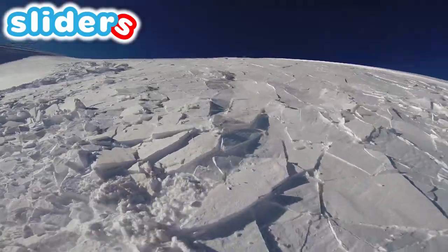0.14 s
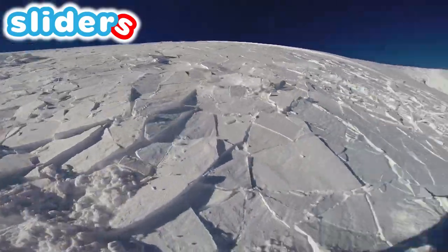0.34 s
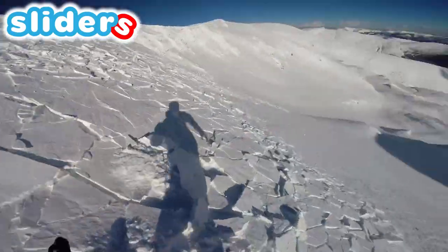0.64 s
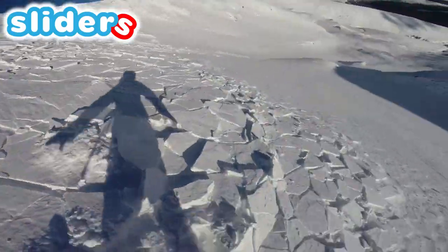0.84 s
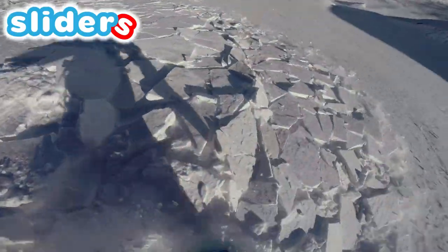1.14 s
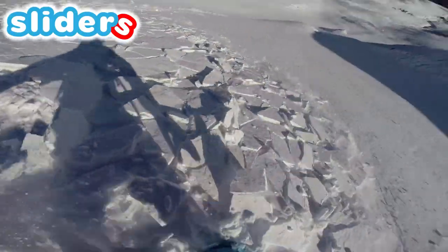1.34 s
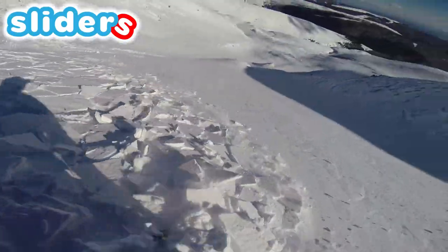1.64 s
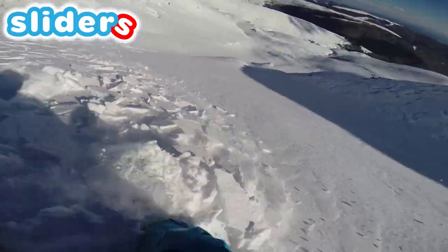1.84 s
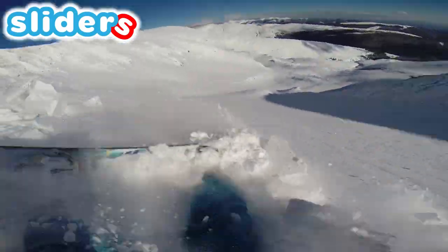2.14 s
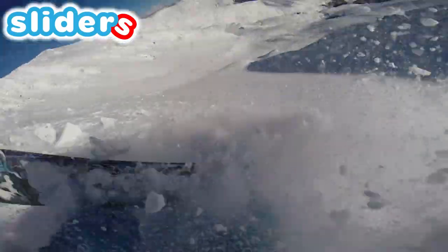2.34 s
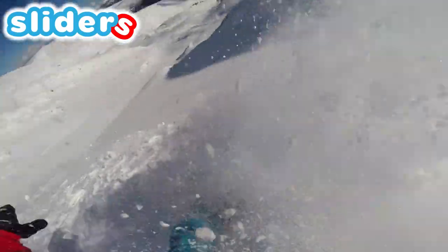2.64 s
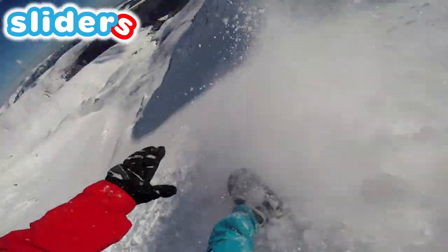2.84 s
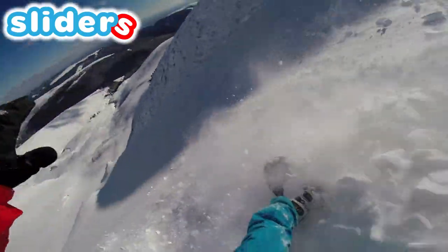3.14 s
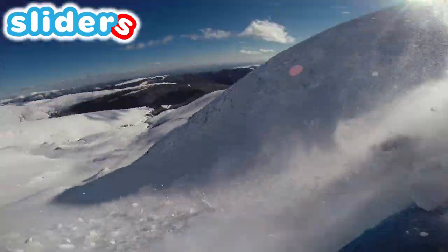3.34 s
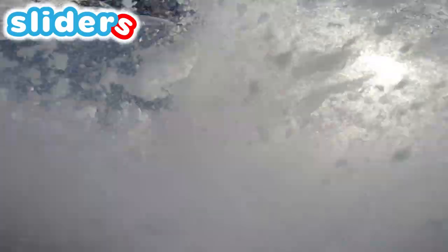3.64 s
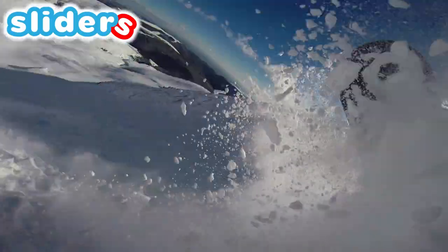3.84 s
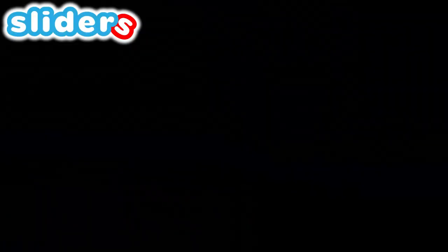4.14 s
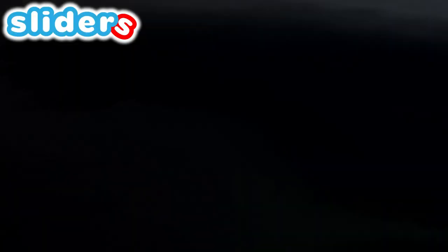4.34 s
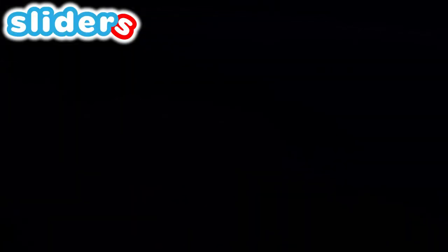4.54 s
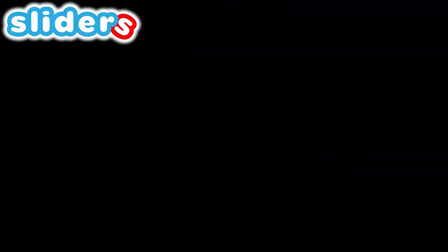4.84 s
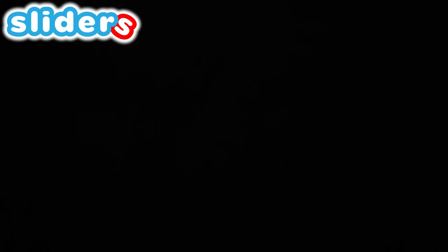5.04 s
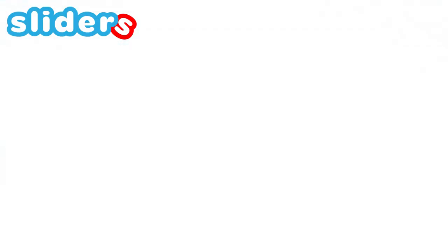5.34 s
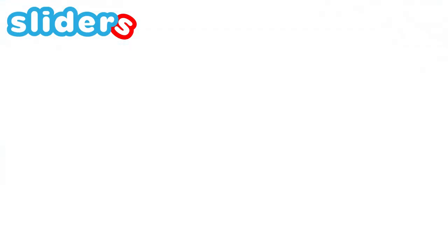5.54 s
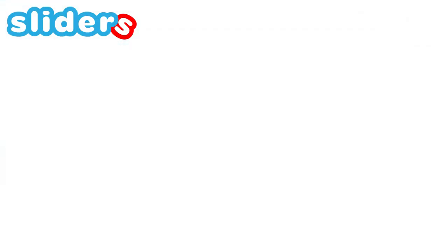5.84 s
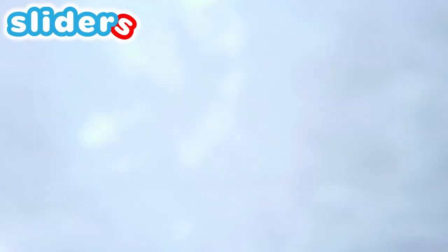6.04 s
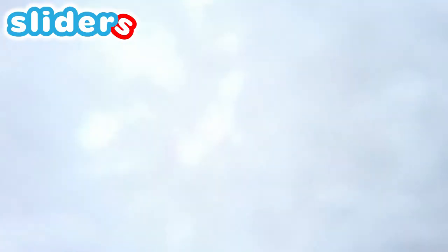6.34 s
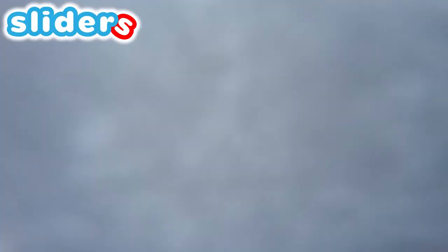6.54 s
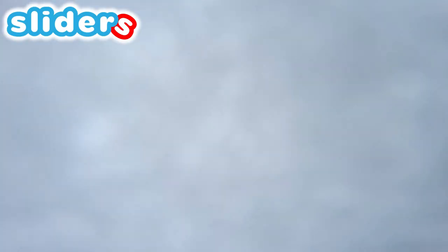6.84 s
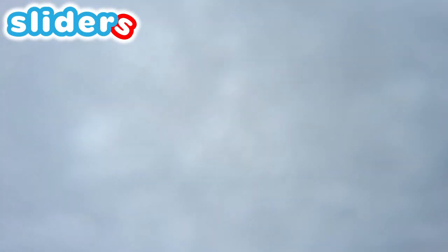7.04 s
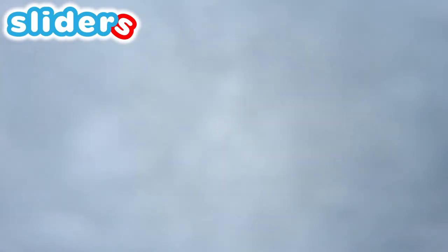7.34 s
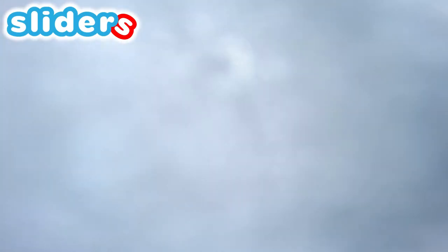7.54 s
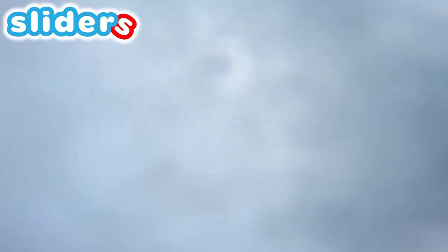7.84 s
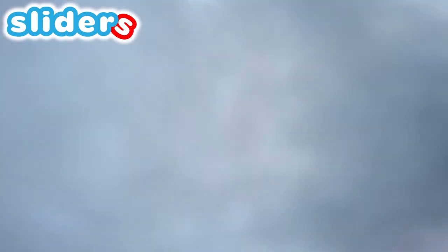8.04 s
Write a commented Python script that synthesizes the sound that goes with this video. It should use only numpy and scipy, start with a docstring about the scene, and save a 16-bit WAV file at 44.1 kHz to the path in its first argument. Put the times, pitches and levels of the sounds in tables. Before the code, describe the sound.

Sliding snow heard through a camera case, with no echo. Quiet rumbling and a few deep bouncing thuds lead to a crunchy double blow, then a brief calm. Knocks and icy spray thicken into a dense, loud, mid-heavy grinding roar with cracks and hollow clacks. The snow packs in jerks and subsides, with a hard hit, soft ticks and fine powder hiss before more heavy thuds.

```python
"""Rumble and dull thumps come first, with blocks crunching: a snowboarder is carried off by a slab avalanche.
The camera worn on the body is the microphone, so everything is close and there is no echo.
Later, snow buries the case, grinds and hisses across it, packs in jerks, eases, and strikes again.
Snow is random ice grains, filtered by the free or the buried case; blows on the mount ring as decaying sines.
Fine powder hisses on the microphone port, over a faint steady hiss and electronic whine."""
import sys
import numpy as np
from scipy import signal
from scipy.fft import rfft, irfft
from scipy.io import wavfile
from scipy.ndimage import uniform_filter1d

SR = 44100
rng = np.random.default_rng(int(sys.argv[2]) if len(sys.argv) > 2 else 0)


def digitize_waveform(pressure):
    """Quantize a signal to 16-bit integers and store it at the path in sys.argv[1].

    Rows of a 2-D input are taken as channels; values are limited to [-1, 1].
    """
    field = np.atleast_2d(pressure).T
    bounded = np.clip(field, -1, 1)
    quanta = np.round(bounded * 32767).astype(np.int16)
    wavfile.write(sys.argv[1], SR, quanta)


N = 361619
TIME = np.arange(N) / SR   # s

# Colour of dry powder and ice crystals at the microphone port: (frequency [Hz], relative level [dB])
POWDER_COLOUR = [(4000, 4.5), (7000, -1.5), (10000, 1), (13000, -7), (15500, -5.5)]
# Hardness is 0 for packed snow, below 0 for soft and dull, above 0 for icy and bright.
# Bass and treble lie this far under the middle at hardness 0:
SLIDE_FOCUS_DB, KNOCK_FOCUS_DB, CRUNCH_FOCUS_DB = 8, 12.5, 6.5


def from_db(db):
    """Decibels to gain."""
    return 10 ** (np.asarray(db) / 20)


def rms_one(x):
    """Scale to unit power."""
    return x / np.sqrt(np.mean(x ** 2) + 1e-20)


def even(x, span_s):
    """Hold the power near one over this span, keeping the finer grain."""
    power = np.abs(uniform_filter1d(x ** 2, int(span_s * SR) + 1))
    return x / np.sqrt(power + 1e-12)


def in_time(rows):
    """One curve per column, joined by straight lines."""
    s, *columns = np.transpose(rows)
    return [np.interp(TIME, s, column) for column in columns]


def drift(rate):
    """Slow random wandering with rms 1, through two random points per cycle of the rate in Hz."""
    knots = rng.standard_normal(N // 8)
    return rms_one(np.interp(TIME * rate * 2, np.arange(len(knots)), knots))


def gust(start, length, rise_s, fall_s):
    """Rise, hold and die away."""
    t = TIME - start
    return np.clip(t / rise_s, 0, 1) * np.exp(-np.clip((t - length) / fall_s, 0, 20))


def swell(s, length, rise, fall):
    """Pressure builds quickly, sags while the block gives way, and lets go."""
    out, start = np.zeros(N), int(s * SR)
    t = TIME[:min(N - start, SR // 4)]
    release = np.maximum(t - length * 0.72, 0) / fall
    out[start:start + len(t)] = np.minimum(t / rise, 1) * np.exp(-.5 * t / length - release)
    return out


def ring(s, hz, t60):
    """A mode struck at time s: a sine that falls 60 dB in t60 seconds."""
    out, start = np.zeros(N), int(s * SR)
    t = TIME[:min(N - start, SR)]
    out[start:start + len(t)] = np.sin(2 * np.pi * hz * t) * np.exp(-np.log(1000) * t / t60)
    return out


def press(strikes, contact_s):
    """Each strike becomes a push that peaks after the contact time and then relaxes."""
    keep = np.exp(-1 / (contact_s * SR))
    return signal.lfilter([np.e * (1 - keep)], [1, -2 * keep, keep ** 2], strikes + 1e-18)


def grains(per_s, spread_db):
    """Ice grains snapping at random: many small, a few large."""
    sizes = from_db(spread_db * np.minimum(rng.exponential(1, N), 5))
    signs = rng.choice([-1, 1], N)
    snaps = rng.random(N) < per_s / SR
    return rms_one(sizes * signs * snaps)


def colour(x, spectrum, low_hz=5, high_hz=20000, size=8192):
    """Causal minimum-phase filter with this spectrum between two edges; white noise keeps its power."""
    hz = np.maximum(np.arange(size // 2 + 1) * SR / size, 1)
    points = np.array(spectrum)
    gain = from_db(np.interp(np.log(hz), np.log(points[:, 0]), points[:, 1]))
    gain = rms_one(gain / np.sqrt((1 + (low_hz / hz) ** 10) * (1 + (hz / high_hz) ** 10)))
    # folding the cepstrum gives the minimum phase
    cepstrum = irfft(np.log(gain + 1e-6))
    cepstrum[1:size // 2] *= 2
    cepstrum[size // 2 + 1:] = 0
    return signal.oaconvolve(x, irfft(np.exp(rfft(cepstrum))))[:N]


def three_bands(drives, spectrum, churn_hz=150, grind_hz=1200, hiss_hz=3500):
    """Dull, middle and bright parts of one spectrum, each with its own drive."""
    edges = [churn_hz, grind_hz, hiss_hz, SR / 2]
    return sum(colour(x, spectrum, low, high) for x, low, high in zip(drives, edges, edges[1:]))


def resonance(x, hz, width_hz):
    """One resonance with gain 1 on top."""
    return signal.lfilter(*signal.iirpeak(hz, hz / width_hz, fs=SR), x + 1e-18)


def touch(level_db, hardness, focus_db):
    """Gains of the dull, middle and bright parts: the harder the snow, the higher its emphasis."""
    loss_db = focus_db * (np.array([[-1], [0], [1]]) - hardness) ** 2
    return from_db(level_db - loss_db + loss_db.min(axis=0))


def cover():
    """Share of the case that lies under snow, heaping up steadily and sliding off fast."""
    # Snow lying on the case: (from [s], until [s], share covered [0-1])
    burials = [(2.007, 2.417, 0.42), (2.5, 2.953, .6), (3.623, 3.773, 0.94), (3.905, 4.21, 0),
               (4.175, 4.38, 0.88), (4.443, 6.27, 0.99), (6.544, 7.1, 1), (7.146, 7.665, 1)]
    settle_s, shed_s = 0.055, 0.0046
    heaps = sum(share * gust(start, end - start, settle_s, shed_s) for start, end, share in burials)
    return np.clip(heaps, 0, 1)


def on_case(drives):
    """Three drives sound through the case, whose colour changes as snow covers it."""
    # Colour of snow on the free case: (frequency [Hz], relative level [dB])
    free_colour = [(140, 5), (280, -2), (500, -15), (750, -8), (950, -24), (1550, -10), (2100, -3.5),
                   (2700, -11.5), (3500, -27), (4300, -18), (5000, -28.5), (6200, -27), (9000, -39),
                   (15500, -49.5)]
    # Colour of snow on the buried case: (frequency [Hz], relative level [dB])
    buried_colour = [(140, -3.5), (400, -13), (800, -10.5), (1100, -13.5), (1400, -3.5), (1850, -2.5),
                     (2450, 5), (3050, -3.5), (4000, -10.5), (4750, -10.5), (6200, -5.5), (8500, -15),
                     (12200, -20), (15500, -33)]
    buried = cover()
    free_part = three_bands(drives * np.sqrt(1 - buried), free_colour)
    return free_part + three_bands(drives * np.sqrt(buried), buried_colour)


def background():
    """Steady hiss of filtered noise, with a thin whine of sines from the camera's electronics."""
    # Colour of the hiss: (frequency [Hz], relative level [dB])
    hiss_colour = [(150, 2), (300, 0.5), (550, -4.5), (1100, -3), (1500, 0), (2100, -6.5), (3600, -1.5),
                   (4400, -22.5), (5050, -8.5), (6000, -2.5), (7300, -19), (15500, -22)]
    # Faint steady whine: (frequency [Hz], rms level [dB])
    whine_tones = [(11719, -77), (14626, -80)]
    hiss = from_db(-56.5) * colour(rng.standard_normal(N), hiss_colour, 125)
    whine = sum(from_db(level_db) * np.sqrt(2) * np.sin(2 * np.pi * hz * TIME)
                for hz, level_db in whine_tones)
    return hiss + whine


def powder():
    """Puffs of tiny dry grains sift across the microphone port, almost all treble."""
    # Puffs of fine powder: (start [s], length [s], level [dB])
    puff_rows = [(2.505, .33, -53), (2.85, 0.6, -63), (3.48, 0.32, -50), (5.74, 0.45, -38.5),
                 (6.905, 0.098, -42.5), (7.18, 0.503, -45.5), (7.76, 0.34, -45), (7.308, .24, -34.5)]
    rise_s, fall_s = 0.053, 0.05
    puffs = sum(from_db(level_db) * gust(s, length, rise_s, fall_s) for s, length, level_db in puff_rows)
    return puffs * colour(grains(3400, 6.5), POWDER_COLOUR, 3700)


def rumble(shove, lump_db=-1.5, shove_rumble_db=5):
    """Lumpy low pressure on the case, from air buffeting the tumbling rider and from every shove."""
    # Buffeting of the air: (time [s], level [dB])
    buffeting = [(0, -39), (.35, -47), (.55, -34.5), (.98, -28.5), (1.5, -36), (2.1, -36), (2.38, -22.5),
                 (2.62, -38), (3.3, -31.5), (3.6, -24.5), (4.18, -23.5), (5.07, -35.5), (5.5, -21),
                 (6.2, -33.5), (6.4, -35.5), (7.15, -48), (7.6, -25.5), (8.2, -38)]
    # Colour of the rumble: (frequency [Hz], relative level [dB])
    low_colour = [(10, -21), (22, 9.5), (40, -1.5), (64, 6), (85, -4), (135, -8), (200, -22), (400, -61)]
    level_db, = in_time(buffeting)
    # shove rumble is set relative to the dull part of the shove
    pressure = np.hypot(from_db(level_db), from_db(shove_rumble_db) * shove[0])
    lumps = from_db(lump_db * drift(5.4))
    return pressure * lumps * even(colour(grains(1200, 3.2), low_colour), .15)


def shoves():
    """Dull, middle and bright pressure of passing snow masses; soft ones swell and fade more slowly."""
    # Masses shoving across the case: (start [s], length [s], level [dB], hardness [-])
    masses = [(0.533, 0.052, -42, -0.44), (0.724, 0.12, -38, -0.76), (1.072, 0.055, -51.5, -0.53),
              (1.464, 0.051, -45, -0.46), (1.974, 0.82, -56.5, -0.19), (2.227, 0.15, -44.5, -0.12),
              (2.533, 0.044, -57, -0.35), (2.655, 0.2, -47.5, 0.13), (3.356, .05, -36.5, -1.04),
              (3.483, 0.046, -40, 0.42), (3.628, 0.15, -38, 0.48), (3.957, 0.047, -25.5, -0.23),
              (4.036, .17, -31, -0.17), (4.26, 0.081, -25, -0.66), (4.452, 0.13, -23.5, 0),
              (4.547, 0.1, -19, -0.078), (4.625, 0.046, -23, -0.91), (4.732, .16, -21, -0.031),
              (4.93, 0.019, -26, 0.15), (4.994, 0.072, -23, 0.29), (5.147, 0.078, -23, 0.22),
              (5.267, 0.16, -22, 0.073), (5.333, 0.04, -28.5, -0.43), (5.482, .11, -23, -.05),
              (5.752, 0.12, -35, 0.33), (5.969, .28, -31.5, -0.04), (5.819, 0.083, -25, -0.2),
              (6.136, 0.027, -24.5, 0.14), (6.375, 0.076, -36, -0.39), (6.488, 0.059, -40.5, -0.39),
              (6.575, 0.096, -27, -0.13), (6.863, 0.12, -42, 0.23), (7.033, 0.045, -46, 0.46),
              (7.171, 0.14, -46.5, 0.13), (7.334, .09, -32, 0.45), (7.442, .12, -34, .5),
              (7.593, 0.089, -42, -0.9), (7.987, 0.068, -26.5, -0.62), (8.098, 0.054, -28.5, -0.75)]
    rise_s, fall_s = 0.019, 0.014   # at hardness 0
    soft_slowing = 1.45   # doublings of rise and fall time per unit of softness
    power = 0
    for s, length, level_db, hardness in masses:
        slow = 2 ** (-soft_slowing * hardness)
        passing = gust(s, length, slow * rise_s, slow * fall_s)
        power = power + (touch(level_db, hardness, SLIDE_FOCUS_DB) * passing) ** 2
    return np.sqrt(power)


def drag(uneven_db=1.5, churn_db=5.0, spray_db=-60):
    """Steady flow, uneven most of all in its dull part, turns brighter once it packs onto the case."""
    # Drag of the moving snow on the case: (time [s], level [dB])
    flow_rows = [(0, -61.5), (1.9, -57.5), (2.3, -47), (2.42, -52.5), (3.28, -53.5), (3.55, -35.5),
                 (3.84, -40.5), (4.15, -22.5), (4.41, -37.5), (4.55, -27.5), (5.4, -21.5), (5.7, -31.5),
                 (6.25, -50), (6.28, -45), (6.8, -50), (7.14, -57), (7.55, -33.5), (7.8, -44.5),
                 (8.2, -36.5)]
    free_hardness, buried_hardness = -0.2, 0.18
    level_db, = in_time(flow_rows)
    hardness = free_hardness + (buried_hardness - free_hardness) * cover()
    dull, middle, bright = touch(level_db + uneven_db * drift(8.3), hardness, SLIDE_FOCUS_DB)
    churned = dull * from_db(churn_db * drift(7.6))
    # airborne spray sets a floor under the bright part
    return np.array([churned, middle, np.hypot(bright, from_db(spray_db))])


def lumpiness(lumps_per_s=48, contact_s=0.002, lump_db=-4):
    """Small lumps tumble past at random; each briefly raises the dull, middle or bright part."""
    hits = rng.random((3, N)) < lumps_per_s / SR
    sizes = from_db(lump_db) * np.minimum(rng.exponential(1, (3, N)), 3)   # relative to the shove
    return np.hypot(1, press(hits * sizes, contact_s))


def clods(low_hz, high_hz, surge_db, sharpness, count=12):
    """Clods scrape by as resonances driven by shared-out grains; each comes and goes at its own pitch."""
    friction, dealt = grains(5000, 1.9), rng.integers(0, count, N)
    total = 0
    for k, hz in enumerate(np.geomspace(low_hz, high_hz, count)):
        scrape = resonance(friction * (dealt == k), hz, hz / sharpness)
        surge = from_db(surge_db * np.minimum(drift(22), 2))
        total = total + scrape * surge / np.sqrt(hz)
    return rms_one(total)


def sliding_snow(shove, slip_db=0.38, patchy_db=2.2, clod_db=-8.5, grit_db=-8, crystal_db=-14):
    """Grains grind and spray on the case; where it is buried, they also jerk and clods scrape past."""
    buried = cover()
    slips = slip_db * drift(70) * buried
    levels = np.hypot(drag(), shove * lumpiness())
    drives = [level * grains(12000, 2.5) * from_db(slips + patchy_db * drift(45)) for level in levels]
    grinding = on_case(np.array(drives))
    scraping = from_db(clod_db) * levels[1] * clods(1510, 2710, surge_db=6.0, sharpness=8.1)
    grit = from_db(grit_db) * levels[2] * clods(3900, 5450, surge_db=-1.5, sharpness=5.6)
    # single ice crystals spit on the microphone port
    crystals = from_db(crystal_db) * shove[2] * colour(grains(160, 4.1), POWDER_COLOUR, 1900)
    return grinding + crystals + buried * (scraping + grit)


def rubs():
    """Snow rubs hollow notes out of the case: friction excites one resonance per rub."""
    # Rubs: (start [s], length [s], resonance [Hz], width [Hz], level [dB])
    rub_rows = [(1.566, 0.22, 1500, 200, -54), (5.077, 0.055, 1300, 605, -15),
                (5.809, 0.015, 2650, 400, -15.5), (6.079, 0.018, 1440, 300, -16),
                (6.305, 0.14, 2100, 450, -38.5), (6.345, 0.204, 690, 197, -44),
                (6.443, 0.014, 646, 148, -20), (6.509, 0.11, 620, 150, -35), (6.606, 0.015, 1530, 400, -15),
                (6.644, 0.017, 1520, 300, -19), (7.697, 0.21, 655, 200, -44.5),
                (8.035, 0.021, 2280, 497, -19.5), (8.139, 0.043, 300, 200, -14.5),
                (2.32, 0.029, 248, 200, -21.5), (0.811, 0.018, 252, 160, -21.5),
                (8.15, 0.022, 2300, 700, -23)]
    friction = grains(6000, 4.5)
    total = 0
    for s, length, hz, width, level_db in rub_rows:
        note = resonance(resonance(friction, hz, width), hz, 3 * width)
        total = total + from_db(level_db) * swell(s, length, rise=0.008, fall=0.011) * even(note, 2 * length)
    return total


def gear():
    """Struck pieces of gear ring as decaying sines: a faint note, then two hollow clacks."""
    # Strikes on gear: (time [s], frequency [Hz], level [dB], t60 [s])
    gear_rows = [(2.381, 634, -33, .32), (5.734, 1350, -5, .014), (5.804, 1400, -4, .018)]
    return sum(from_db(level_db) * ring(s, hz, t60) for s, hz, level_db, t60 in gear_rows)


def knocks(crush_s=0.0012):
    """Each lump, soft or icy, is pressed onto the case and shatters within a few milliseconds."""
    # Lumps ticking on the case: (time [s], level [dB], hardness [-])
    lump_rows = [(.524, -25, -0.75), (.532, -24.5, -0.16), (.547, -19.5, -1.8), (1.103, -40, -1.3),
                 (1.664, -33, -1.16), (1.846, -34, -6.5), (2.381, -17, 0.23), (2.466, -23.5, .3),
                 (2.529, -24.5, -0.8), (2.765, -29.5, -.55), (3.099, -34, -0.54), (3.341, -38, -1),
                 (3.612, -20, -0.19), (3.65, -11, 0.14), (3.68, -20, -0.19), (3.72, -21, .6),
                 (3.754, -18.5, 0.14), (3.884, -9, -0.24), (3.975, -17, -.1), (4.056, -22, 0.25),
                 (4.072, -17.5, 0.36), (4.208, -1.5, -0.053), (4.224, -21, .4), (4.474, -10.5, -0.19),
                 (4.956, -7.5, -0.016), (5.113, -20, 3), (5.36, -5.5, -0.031), (5.435, -10.5, -0.058),
                 (5.518, -13, -1.8), (5.733, -9, -.6), (5.806, -13.5, -0.1), (5.869, -8.5, 0.26),
                 (5.947, -12.5, -0.26), (6.069, -11, -0.4), (6.121, -12.5, -0.079), (6.387, -29.5, 0.34),
                 (6.405, -37, 0.5), (6.613, -14, 0.46), (6.883, -26.5, 1.1), (6.901, -27.5, 0.6),
                 (6.914, -22, 0.5), (7.069, -26, 0.2), (7.094, -25.5, 0.013), (7.378, -28, .5),
                 (7.409, -25, 0.21), (7.449, -27, 1), (7.485, -21.5, 0.55), (7.529, -27, -.2),
                 (7.694, -9.5, -0.46), (7.86, -25, 0.28), (8.043, -21, -1.8), (8.115, -27, 0.31),
                 (8.141, -8, -2), (8.161, -17, -1.5)]
    strikes = np.zeros((3, N))
    for s, level_db, hardness in lump_rows:
        strikes[:, int(s * SR)] = touch(level_db, hardness, KNOCK_FOCUS_DB)[:, 0]
    return on_case(press(strikes, crush_s) * even(grains(16000, 2.76), 0.0078))


def crunches(slip_db=3.0):
    """A block crushed on the case is a short, uneven shower of fractures that sags after its quick rise."""
    # Crushed blocks: (time [s], length [s], level [dB], hardness [-])
    block_rows = [(0.55, 0.067, -51, -2), (0.809, .019, -25, -2), (2.32, .026, -17, 0.55),
                  (2.374, .012, -9, 0.05), (3.644, 0.017, -23, -0.3), (3.669, 0.042, -21.5, 0.25),
                  (3.872, 0.011, -21, -0.2), (3.932, 0.019, -20.5, -0.3), (3.969, 0.032, -21, 0.14),
                  (4.157, 0.042, -14, -0.4), (4.29, 0.043, -20.5, 0.25), (4.883, 0.017, -13.5, 1.5),
                  (5.302, 0.014, -12, 4), (5.712, 0.017, -18.5, 0.3), (5.814, 0.0079, -15.5, 0.1),
                  (5.846, 0.044, -19.5, 5), (5.944, 0.043, -20, .2), (6.041, 0.072, -20.5, -0.04),
                  (6.115, 0.027, -15, 0.1), (6.198, 0.024, -20.5, 0.1), (6.231, 0.03, -19, 0.53),
                  (6.585, 0.028, -19, 7), (6.642, 0.01, -21.5, 0.5), (6.691, 0.03, -27, -0.38),
                  (7.69, 0.025, -17.5, -0.74), (8.028, 0.043, -17, -1.7), (8.128, 0.042, -23.5, -0.5)]
    fractures = even(grains(9000, 2.7) * from_db(slip_db * drift(200)), 0.018)
    drives = sum(touch(level_db, hardness, CRUNCH_FOCUS_DB) * swell(s, length, rise=0.0083, fall=0.0081)
                 for s, length, level_db, hardness in block_rows)
    return on_case(drives * fractures)


def thumps(lowest_hz=34, order=3):
    """Heavy blows bounce the camera on its mount, a set of damped modes that yields to slower pushes."""
    # Blows: (time [s], level [dB], bounce [Hz], ring t60 [s])
    blow_rows = [(0.55, -15.5, 45, 0.045), (.815, -5, 66.3, 0.28), (1.098, -23.5, 80, 0.052),
                 (2.165, -23.5, 65.8, 0.23), (2.325, -7.5, 65.1, 0.41), (3.612, -6, 107, 0.058),
                 (3.67, -9.5, 76.5, 0.089), (3.978, -9.5, 64.8, 0.33), (4.063, -7.5, 66.7, 0.23),
                 (4.204, -3, 63, 0.036), (4.305, -9, 58, 0.17), (5.579, -11, 61.5, 0.13),
                 (5.714, -14, 53, 0.11), (5.953, -14.5, 63.6, 0.11), (6.056, -9.5, 57, 0.063),
                 (6.122, -13.5, 50.3, 0.29), (6.245, -13, 67.2, 0.24), (6.594, -14, 70, 0.092),
                 (6.611, 1, 64, 0.023), (7.154, -20.5, 69.5, 0.014), (7.527, -15.5, 120, 0.012),
                 (7.696, -6, 66.6, 0.31), (8.030, -13, 69, 0.28), (8.141, -11, 70, 0.19)]
    # Modes of the mount: (multiple of the bounce [-], relative level [dB], share of the ring time [-])
    mount_modes = [(1, 3, 1.12), (.99, -11.5, 1.8), (.68, -15, .45), (1.32, -5, 0.39), (1.95, -6, 0.6),
                   (4.3, -18.5, 0.17)]
    bounce = -sum(from_db(blow_db + mode_db) * ring(s, hz * multiple, t60 * share)
                  for s, blow_db, hz, t60 in blow_rows for multiple, mode_db, share in mount_modes)
    high_pass = signal.butter(order, lowest_hz, "high", fs=SR, output="sos")
    return signal.sosfilt(high_pass, bounce + 1e-18)


def scene():
    """Everything but the steady background happens at the camera itself, so there is no echo."""
    shove = shoves()
    flow = powder() + rumble(shove) + sliding_snow(shove) + rubs()
    blows = gear() + knocks() + crunches() + thumps()
    return (background() + flow + blows)[None]


def record(dry):
    """The hardest blows overload the microphone; the very bottom and the top are cut."""
    dry = signal.sosfilt(signal.butter(1, 8, "high", fs=SR, output="sos"), dry)
    limited = .95 * dry / (1 + dry ** 8) ** (1 / 8)
    cutoff_hz = 15500
    return signal.sosfilt(signal.ellip(10, .2, 70, cutoff_hz, fs=SR, output="sos"), limited)


dry = scene()
out = record(dry)
digitize_waveform(out)
```